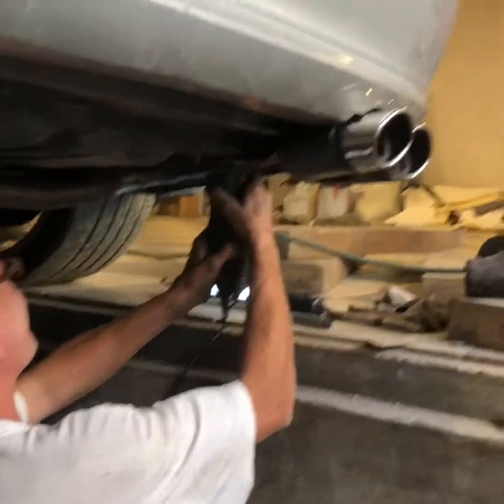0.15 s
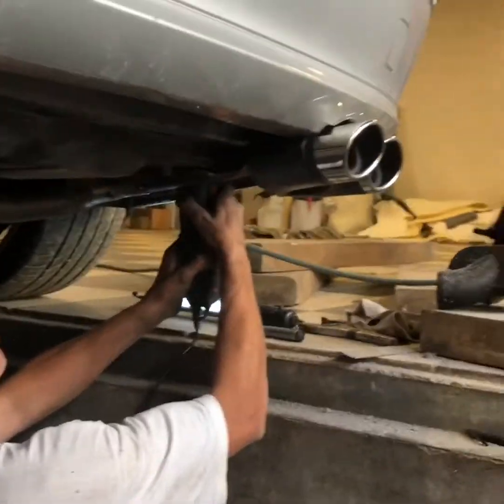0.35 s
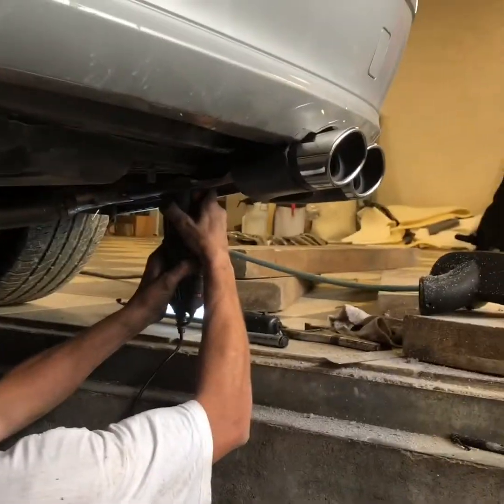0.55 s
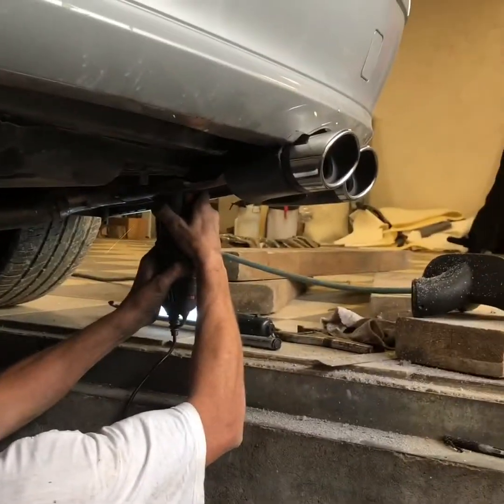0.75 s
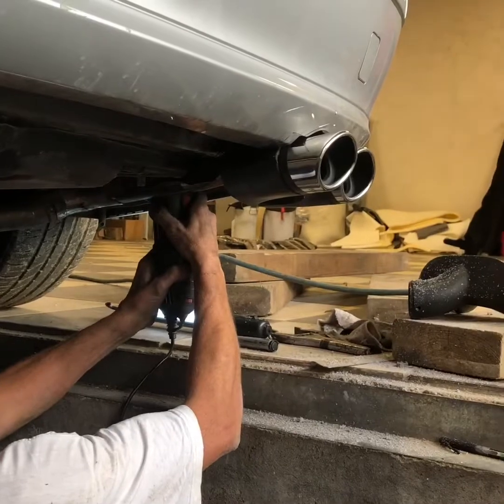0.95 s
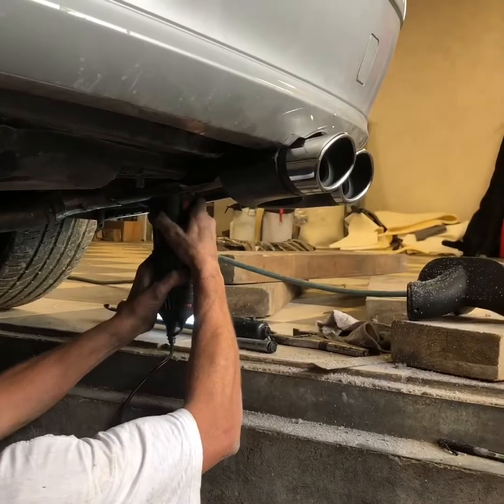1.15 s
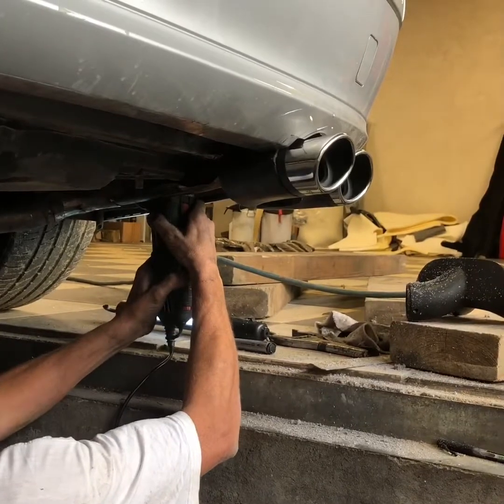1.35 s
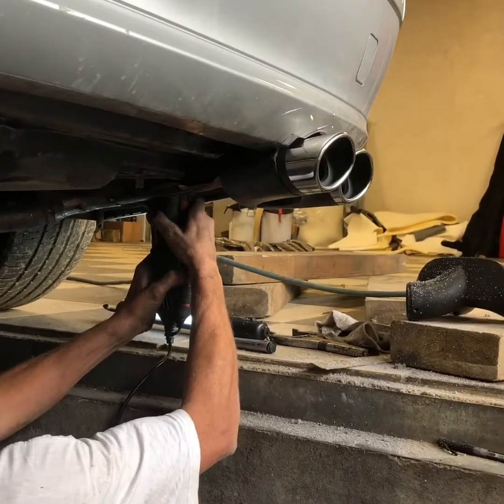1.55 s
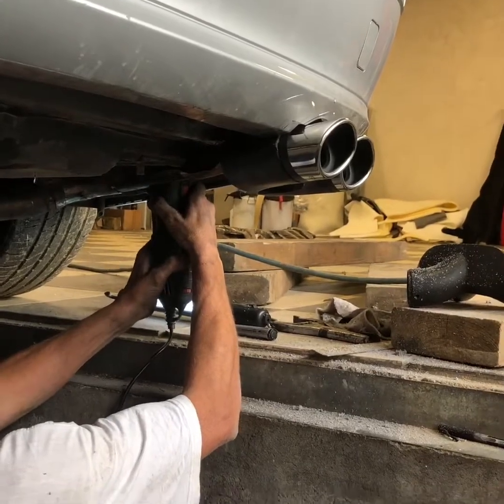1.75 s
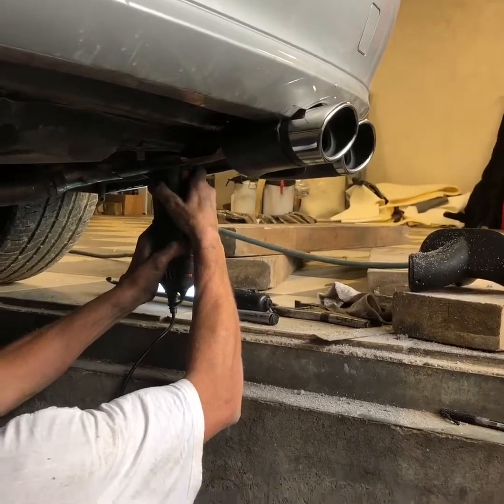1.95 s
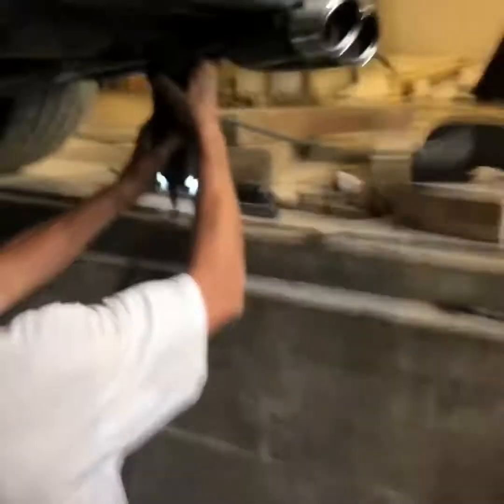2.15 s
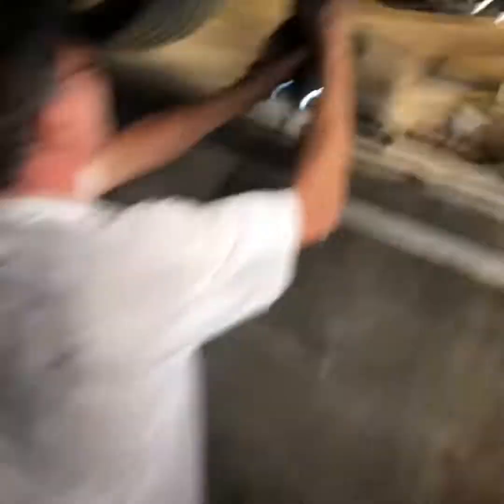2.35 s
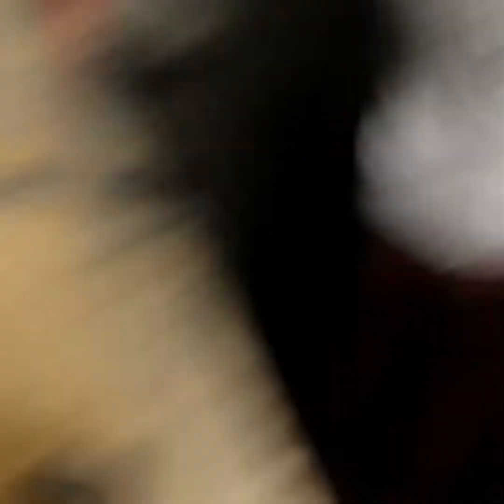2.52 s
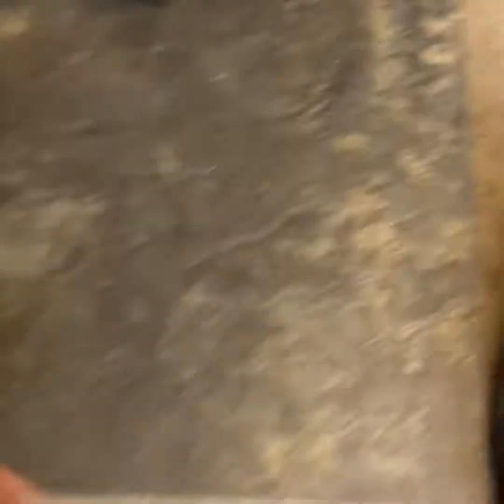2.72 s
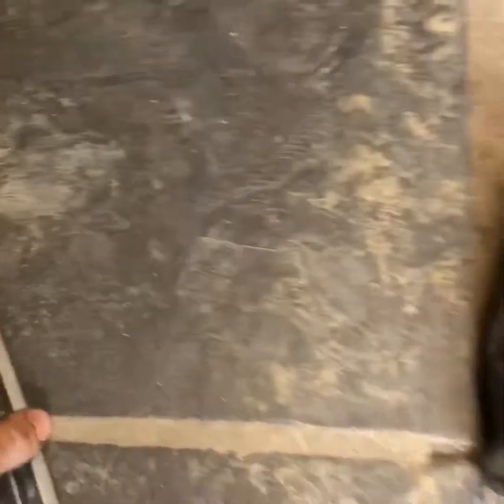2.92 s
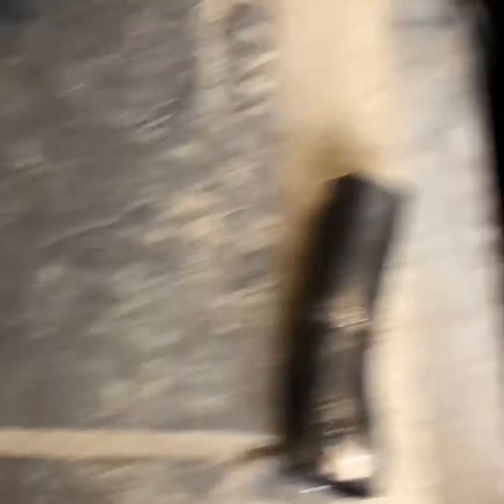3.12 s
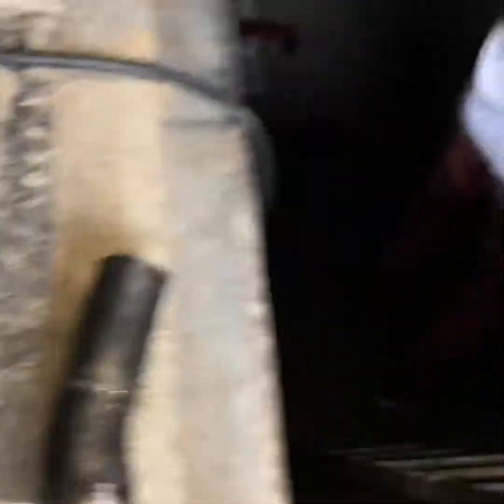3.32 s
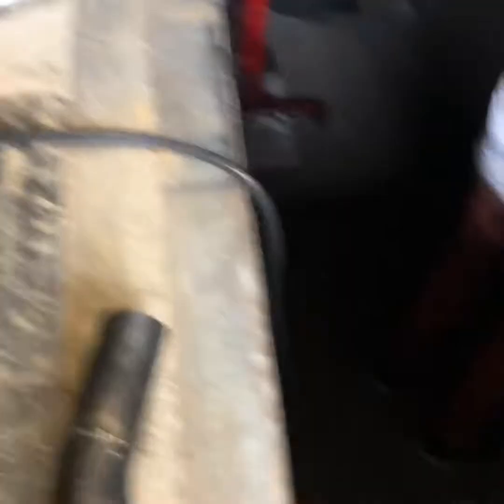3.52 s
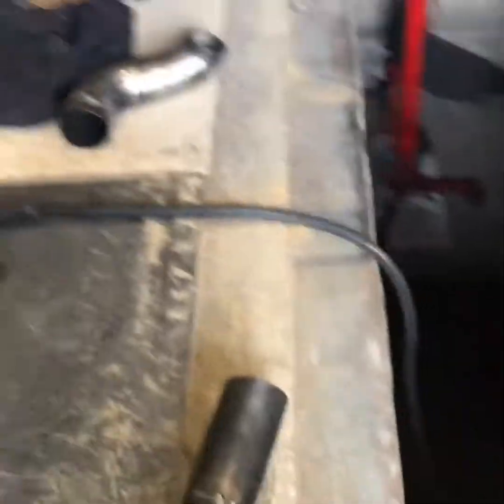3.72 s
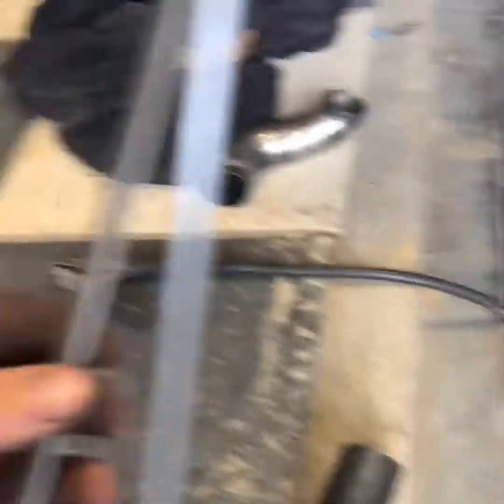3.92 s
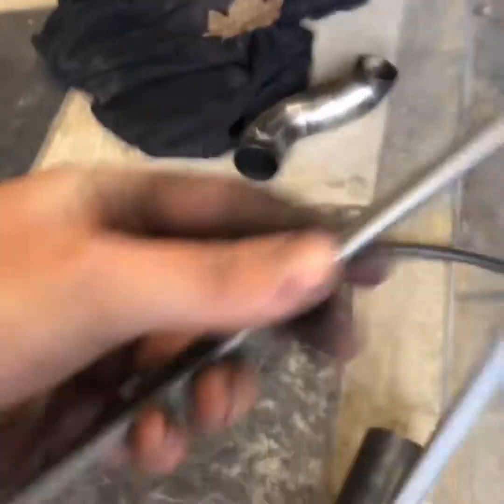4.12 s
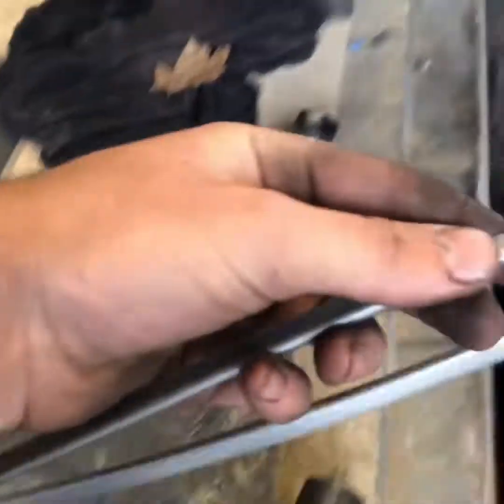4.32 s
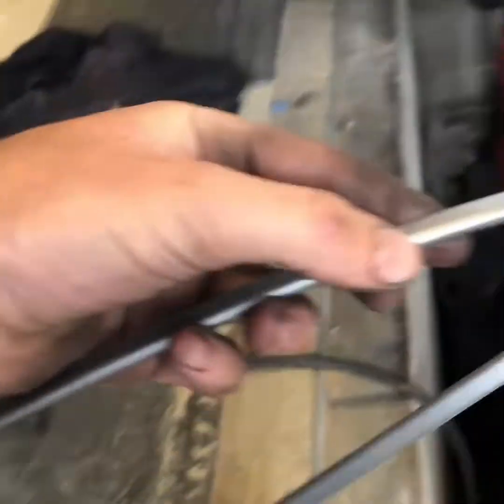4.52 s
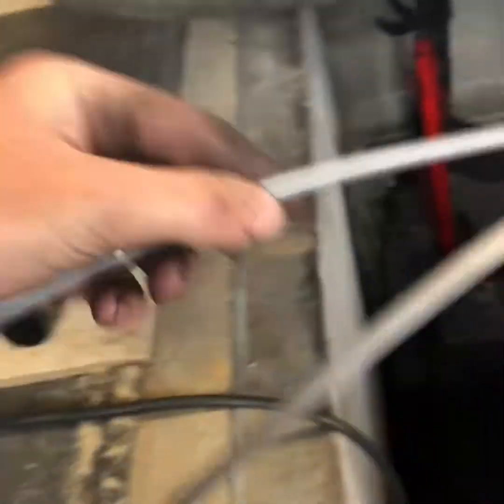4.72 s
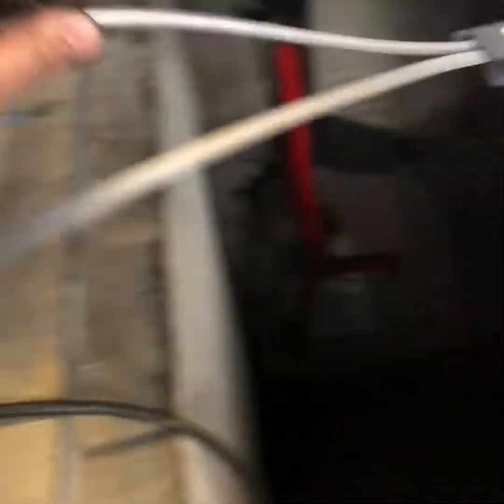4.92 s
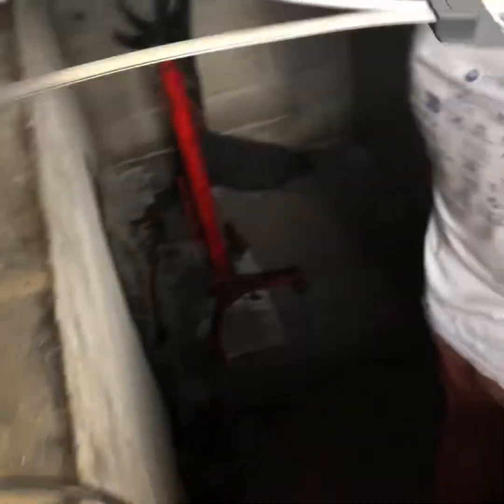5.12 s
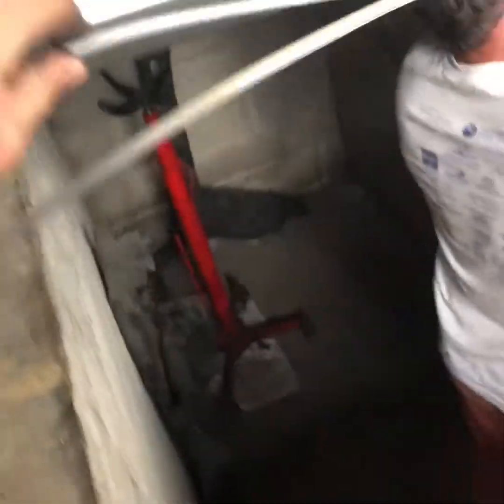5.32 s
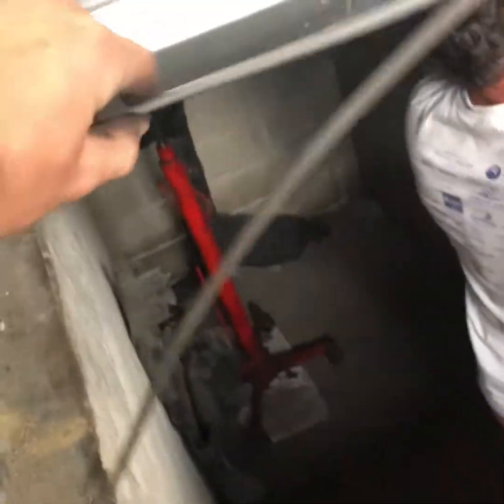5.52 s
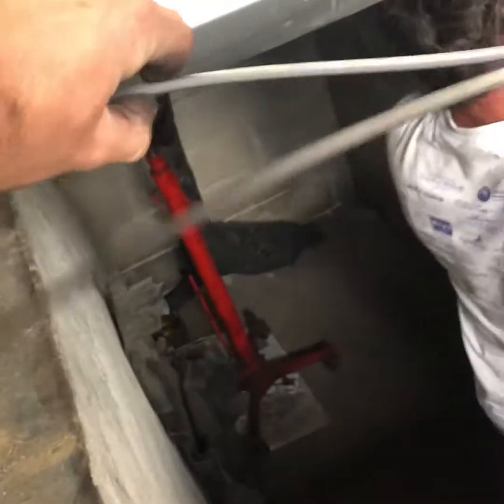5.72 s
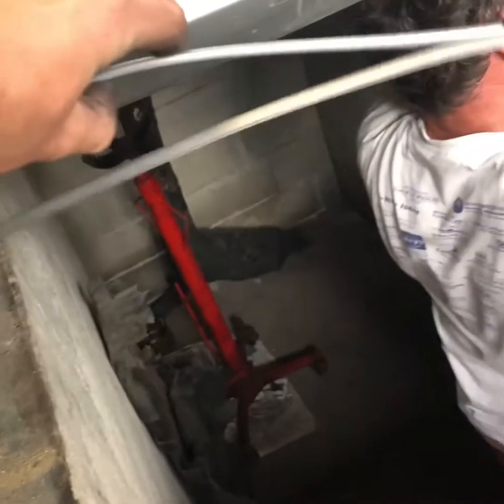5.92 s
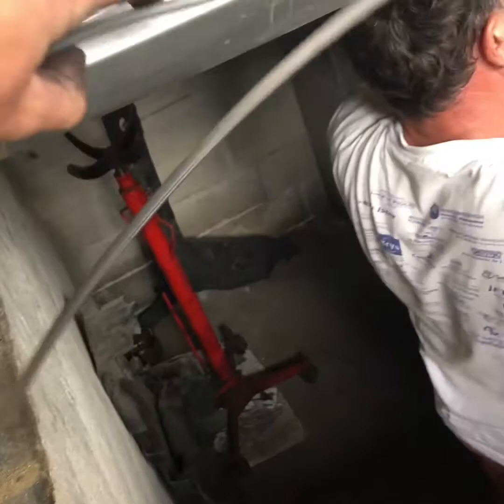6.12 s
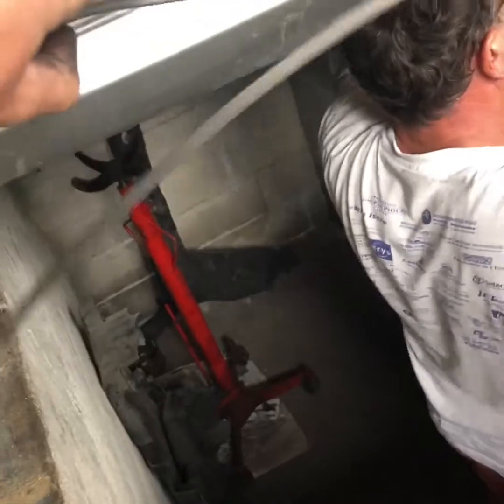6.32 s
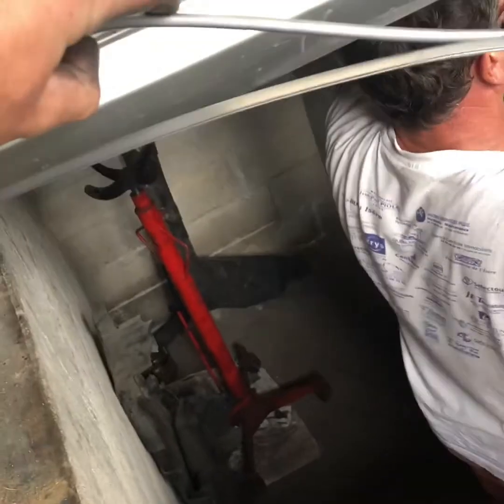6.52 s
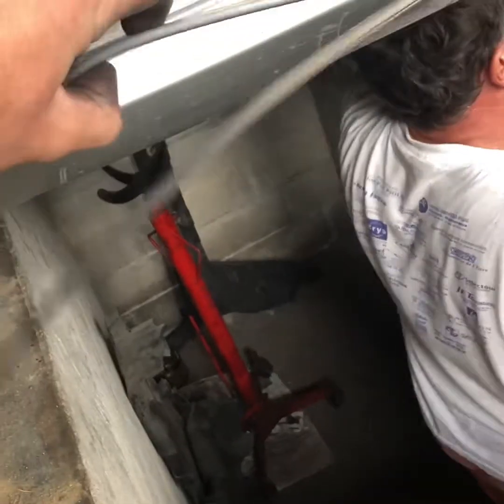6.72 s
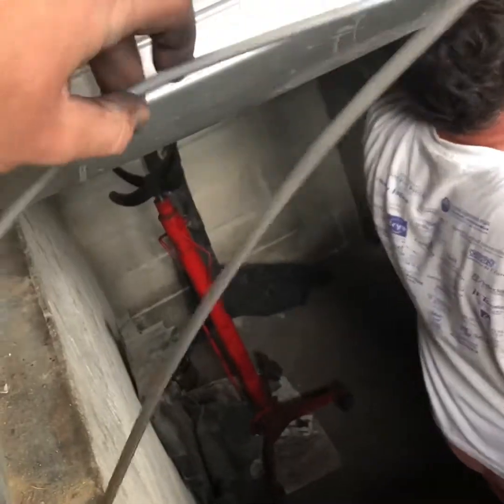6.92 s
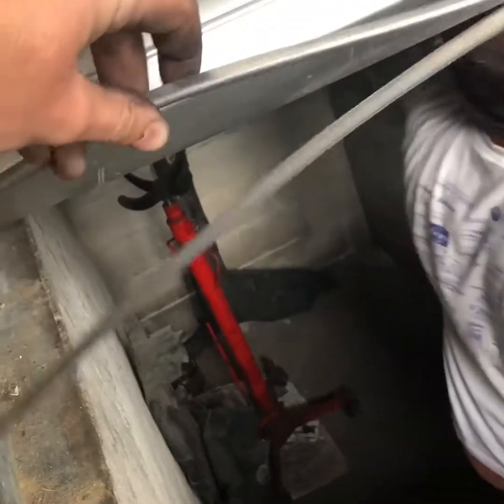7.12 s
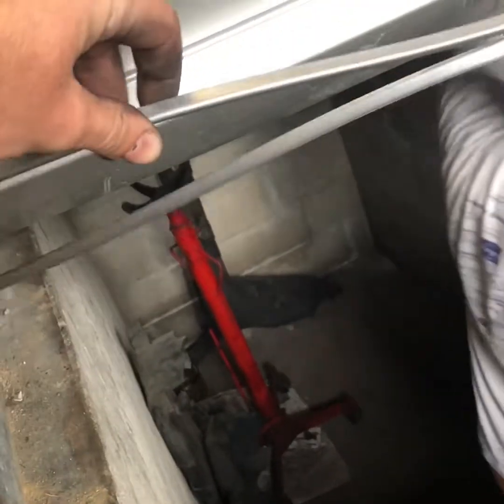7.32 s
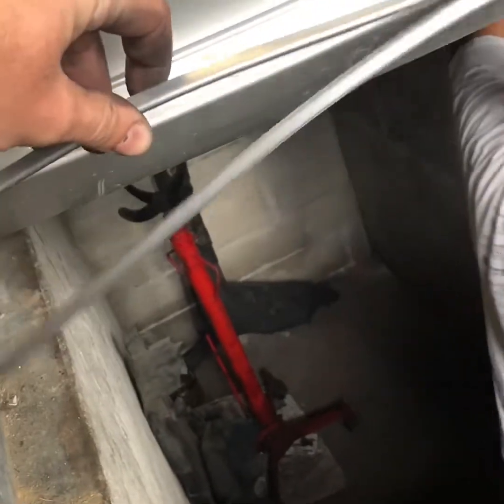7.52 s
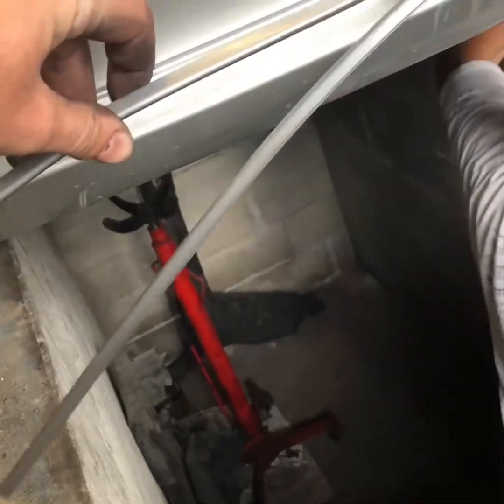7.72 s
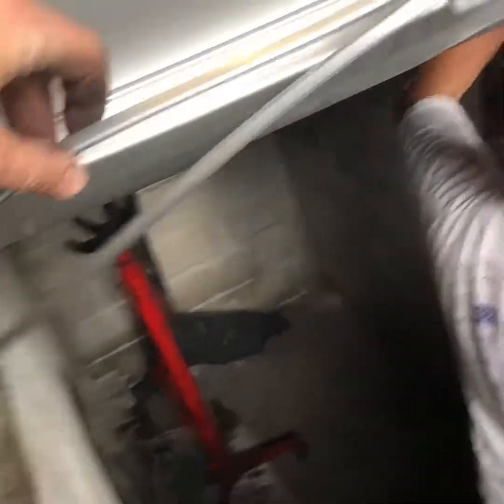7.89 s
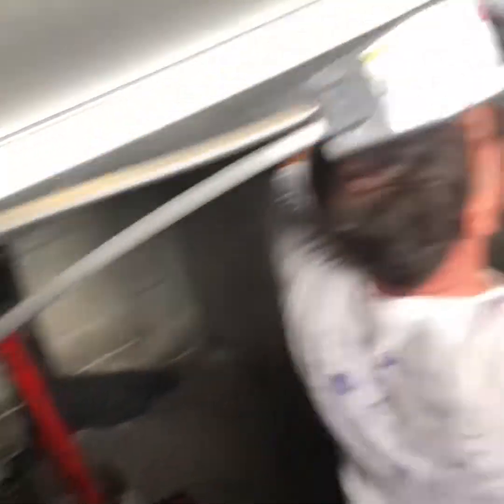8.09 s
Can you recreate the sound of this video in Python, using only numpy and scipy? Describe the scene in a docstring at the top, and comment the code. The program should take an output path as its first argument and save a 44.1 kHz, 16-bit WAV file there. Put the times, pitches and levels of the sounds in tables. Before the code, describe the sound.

In a concrete garage pit, an angle grinder rasps harshly on a steel exhaust pipe, with a pulsing scrape and wavering squeal. The grinding fades as the microphone turns away, with a few soft handling thumps. The tool whines freely, is switched off and coasts down, its loose gears rattling and clacking. Near the end come a few sharp, hollow knocks over a faint lamp hum.

```python
"""An angle grinder rasps on a steel exhaust pipe in a concrete garage pit: grit excites the pipe's modes,
which fade as the microphone turns away. The disc lifts off; the tool runs free with fan noise and whine,
is switched off and coasts down, its loose gears rattling the casing. A tube lamp hums at mains harmonics.
Four soft handling thumps come midway, and sharper knocks with a hollow boom near the end."""
import sys
import numpy as np
from scipy import signal
from scipy.fft import rfft, irfft, next_fast_len
from scipy.io import wavfile
from scipy.ndimage import uniform_filter1d

SR = 44100
rng = np.random.default_rng(int(sys.argv[2]) if len(sys.argv) > 2 else 0)


def wav_out(sig):
    """Save sig, one row per channel (or a flat mono array), as 16-bit PCM at SR to the path in sys.argv[1]."""
    wavfile.write(sys.argv[1], SR, np.round(np.clip(np.atleast_2d(sig).T, -1, 1) * 32767).astype(np.int16))


N = 359403
T = np.arange(N) / SR
RUN_HZ, PINION, CROWN = 317.4, 11, 36  # full shaft speed; teeth on the two gears
# Gearbox modes. Each row: frequency in Hz, width in Hz, relative level in dB.
GEARBOX = [(3150, 250, -8), (3736, 220, -2), (3924, 190, 4.5), (4542, 84, 4), (4740, 270, 5)]
# Tooth knocks of the last slow turns. Each row: time in seconds, level in dB.
COAST_LEVEL = [(6.2, -68), (6.6, -60), (7.0, -59), (7.3, -58.5), (7.6, -61.5), (7.85, -65.5), (8.15, -72)]


def undb(db):
    return 10 ** (np.asarray(db) / 20)


def unit(x):
    return x / np.sqrt(np.mean(x ** 2))


def noise():
    return rng.standard_normal(N)


def curves(table):
    """Linear interpolation of each column over time."""
    s, *columns = np.transpose(table)
    return [np.interp(T, s, c) for c in columns]


def walk(rate):
    """Slow random modulation: about `rate` values a second, smoothed, with a spread near 1."""
    k = int(SR / rate)
    steps = np.repeat(rng.standard_normal(N // k + 1), k)
    return 0.99 * uniform_filter1d(uniform_filter1d(steps, k), k)[:N]


def spell(start, end):
    """A gate with linear fades of 41 ms."""
    return np.clip(np.minimum(T - start, end - T) / 0.041 + .5, 0, 1)


def add(out, s, sound):
    """Superposition of a sound starting at s seconds."""
    i = int(s * SR)
    out[i:i + len(sound)] += sound[:N - i]


def shape(x, gain):
    """Linear filtering: the spectrum is multiplied by gain(frequency)."""
    size = next_fast_len(len(x))
    return irfft(rfft(x, size) * gain(np.arange(size // 2 + 1) * SR / size + 1), size)[:len(x)]


def colour(points):
    """A spectral envelope through (Hz, dB) points, on a logarithmic frequency axis."""
    hz, db = np.transpose(points)
    return lambda f: undb(np.interp(np.log(f), np.log(hz), db))


def modes(table):
    """Frequency response of damped resonators in parallel."""
    return lambda f: sum(undb(db) / (1 + 1j * (f / hz - hz / f) * hz / width) for hz, width, db in table)


def resonate(x, hz, width):
    """Two equal resonators in series pass a band with steep skirts."""
    return shape(x, lambda f: modes([(hz, width, 0)])(f) ** 2)


def band(x, lo_hz, hi_hz):
    """Band-pass filtering to unit rms."""
    return unit(shape(x, lambda f: 1 / np.sqrt((1 + (lo_hz / f) ** 8) * (1 + (f / hi_hz) ** 8))))


def contact_force(disc):
    """Sawtooth modulation: a high spot bites each turn, a bounce every second turn, and each eases off."""
    # Each row: time in seconds, depth of the bounce in dB, depth of the high spot in dB.
    depths = [(0, 4, 4), (.3, 7.5, 4), (1.1, 6.5, 4), (1.4, 1.5, 4.5), (2.15, 1.5, 4.5), (2.3, 6, 3),
              (2.45, 1.5, 2.5), (3.3, 1.5, 2.5)]
    bounce_db, spot_db = curves(depths)
    bounce = (disc / 2 + .04 * walk(15)) % 1
    spot = (disc + .06 * walk(15)) % 1
    pulse_db = (1 + .35 * walk(8)) * (bounce_db * (.5 - bounce) + spot_db * (.5 - spot))
    force = undb(pulse_db + .8 * walk(35) + walk(250) + .35 * walk(8))
    return uniform_filter1d(force, size=SR // 500)


def rasp(bite):
    """Friction noise drives the pipe's modes; the same grit returns each turn, forming a comb filter."""
    # Each row: time in seconds, rasp level in dB, then body, sizzle and rumble in dB relative to it.
    levels = [(0, -33, -15.5, -2, -22), (.5, -32.5, -15.5, -4, -24), (1.05, -33, -16, -3, -25),
              (1.38, -30.5, -20.5, -5, -28), (1.78, -33, -16, -2, -20), (1.95, -32, -17, -1.5, -26.5),
              (2.3, -31.5, -16, -3, -27.5), (2.55, -32, -11.5, 1, -16.5), (2.7, -35, -14.5, 1.5, -20.5),
              (2.86, -38.5, -12.5, -1.5, -24), (2.98, -35, -18, -1, -26), (3.06, -41, -11, -6, -24),
              (3.13, -39, -9, -4.5, -27), (3.26, -50.5, -6, -13, -10), (3.36, -63, -8, -11, -17.5)]
    # Spectrum of the scrape. Each row: frequency in Hz, relative density in dB.
    spectrum = [(71, -68), (120, -23.5), (295, -18), (773, -27.5), (1140, -18), (1790, -13.5),
                (2240, -19.5), (2990, -6), (3240, -7.5), (3740, -3.5), (4060, -6), (4500, -4), (9990, -2),
                (13000, -8.5), (16000, -15)]
    # Each row: frequency in Hz, width in Hz, relative level in dB.
    pipe_modes = [(1286, 23, -5.5), (1845, 30, -7), (2677, 80, -1), (3010, 20, -3), (3310, 45, -8),
                  (3494, 18, -1.5), (3790, 70, -4), (3868, 40, -3), (4360, 90, -8), (4550, 55, -3),
                  (4752, 27, -4), (4940, 30, -4), (5336, 80, -4), (5630, 18, -5.5), (6180, 38, -4),
                  (6350, 38, -2), (6850, 50, -3), (6987, 20, -5.5), (7290, 60, -3), (8250, 90, -3),
                  (8630, 40, -2), (8920, 35, -4), (9655, 50, 1), (10500, 80, -3), (10900, 40, -6),
                  (11480, 100, -2), (12000, 100, -6), (12900, 100, -1), (13650, 70, -5)]
    rasp_db, body_db, sizzle_db, rumble_db = curves(levels)
    turn = round(SR * CROWN / PINION / RUN_HZ)
    grit = bite * signal.lfilter([1], np.r_[1, np.zeros(turn - 1), -.4], noise())
    base = colour(spectrum)
    # as the disc creeps along, some modes are fed more than others
    rings = sum(undb(1.6 * walk(1.8)) * shape(grit, lambda f: base(f) * np.abs(modes(pipe_modes[k::4])(f)))
                for k in range(4))
    facing = np.clip((2.624 - T) / 0.47, .15, 1)  # the microphone turns away
    scrape = shape(grit, base) + 2 * facing * rings
    bands = (band(scrape, 2480, 7900)
             + undb(body_db) * band(scrape, 1080, 2100)
             + undb(sizzle_db) * band(scrape, 10600, 18000)
             + undb(rumble_db + 1.5 * walk(12)) * band(scrape, 110, 1050))
    return (T < levels[-1][0]) * undb(rasp_db) * bands


def squeal(bite):
    """Friction sustains the two freest pipe modes as wavering tones."""
    # Each row: time in seconds, levels of the lower and the upper tone in dB.
    levels = [(0, -45.5, -47), (.1, -37.5, -43), (.2, -42, -44), (.3, -38, -42), (.38, -36, -46),
              (.5, -35.5, -38), (.9, -34.5, -39.5), (1.22, -38, -40.5), (1.32, -45, -48.5),
              (1.6, -36.5, -40), (1.75, -42, -41), (1.87, -35.5, -37), (1.96, -52, -39), (2.06, -54, -45),
              (2.13, -38.5, -44), (2.3, -49, -46), (2.5, -56, -45), (2.7, -62, -53)]
    drive = np.sqrt(2) * spell(-1, levels[-1][0]) * bite ** .3
    return drive * sum(undb(db + 0.96 * walk(34)) * np.sin(2 * np.pi * hz * T + 2.1 * walk(40))
                       for hz, db in zip((3006, 6556), curves(levels)))


def passing_modes(bite):
    """Forced resonances stand out as tool and microphone move: wide ones rough, narrow ones tonal."""
    # Each row: start and end in seconds, frequency in Hz, width in Hz, level in dB.
    resonances = [(-3.5, 1.2, 1162, 8.9, -53), (-1, 0.91, 4560, 90, -42.5), (-0.2, .95, 3497, 18, -49.5),
                  (-1.5, .9, 3500, 88, -47), (1, 1.7, 4900, 200, -44), (-1.5, 0.78, 5100, 120, -53.5),
                  (-0.5, 1.076, 1800, 57, -48), (0, 1.1, 1350, 58, -55.5), (2.2, 2.6, 1845, 30, -52),
                  (2.25, 2.58, 1750, 20, -54), (1.25, 1.45, 7150, 200, -41), (1.8, 2.5, 7400, 200, -39),
                  (1.75, 2.3, 2425, 20, -56), (2.93, 3.17, 4900, 110, -43.5), (1.2, 2.8, 4800, 100, -46),
                  (3.1, 3.33, 4520, 60, -54), (3.1, 3.33, 4000, 200, -54), (2.48, 2.72, 3410, 30, -40),
                  (2.15, 2.38, 3490, 24, -43), (3.0, 3.17, 1850, 25, -52.5), (2.78, 2.95, 6900, 50, -48),
                  (2.93, 3.13, 3850, 90, -46), (3.08, 3.22, 3550, 100, -48), (2.3, 2.55, 3870, 46, -44),
                  (1.5, 2.4, 5000, 3100, -41.5), (3.6, 4.28, 1305, 50, -60), (2.5, 3.6, 11600, 560, -65),
                  (1.5, 7.1, 6300, 250, -71.5)]
    out = np.zeros(N)
    for start, end, hz, width, db in resonances:
        mode = unit(shape(noise() * bite, modes([(hz, width, 0)])))
        if width <= 45:
            drive = 1.5 * bite ** .3 * undb(2 * walk(20))
            mode = unit(mode + drive * np.sin(2 * np.pi * hz * T + 2 * walk(2 * width)))
        out += undb(db) * spell(start, end) * mode
    return out


def drumming(disc):
    """Periodic forcing: the disc's unbalance throbs and its high spots drum the pipe until it lifts."""
    # Each row: multiple of the turn rate, relative level in dB.
    harmonics = [(2, -30), (3, -22.5), (4, -19.5), (5, -14), (6, -25.5), (7, -12), (8, -20), (9, -9),
                 (10, -5), (11, -21), (12, 0.5), (13, -2), (14, -11.5), (15, -21.5), (16, -12), (17, -10),
                 (18, -2), (19, 2.5), (20, 2), (21, -11.5), (22, -12.5), (23, -22), (24, -10.5), (25, 1),
                 (26, -7)]
    # Each row: time in seconds, throb in dB, bounce in dB relative to it, drumming gain in dB.
    levels = [(0, -69, -6.5, -61.5), (.25, -69.5, -5.5, -60.5), (1.7, -64, -7, -58.5),
              (1.85, -63, -11, -55), (2.1, -60, -28.5, -52), (2.45, -62.5, -2.5, -51),
              (2.68, -61, -11, -61), (3.3, -67, -40, -65)]
    throb_db, bounce_db, drum_db = curves(levels)
    drum = sum(undb(db + 3.46 * walk(3.82)) * np.sin(2 * np.pi * (k * disc + rng.random()))
               for k, db in harmonics)
    sway = np.sin(2 * np.pi * disc) + undb(bounce_db) * np.sin(np.pi * disc)
    throb = np.sqrt(2) * undb(throb_db + 1.5 * walk(5)) * sway
    touching = np.clip((3.29 - T) / 0.059, 0, 1)
    return touching * (throb + undb(drum_db) * drum)


def lamp():
    """Mains harmonics waver a little over the noise floor of the garage."""
    # Each row: frequency in Hz, rms level in dB.
    harmonics = [(50, -98), (99.8, -74.5), (149.7, -88), (199.6, -66.5), (249.5, -83.5), (299.4, -75),
                 (399.2, -96.5)]
    # Each row: frequency in Hz, relative density in dB.
    room_spectrum = [(15, -65.5), (25, -32.5), (145, -11.5), (200, -12), (439, -14), (624, -19), (840, -24),
                     (1130, -14), (4740, -30), (16000, -60)]
    hum = sum(undb(db + walk(3.3)) * np.sqrt(2) * np.sin(2 * np.pi * (hz * T + rng.random()))
              for hz, db in harmonics)
    return hum + undb(-66.5 + 1.6 * walk(6.7)) * unit(shape(noise(), colour(room_spectrum)))


def click(hz, t60, peak_db):
    """A hard contact: one heavily damped sinusoid."""
    t = np.arange(SR // 50) / SR
    return undb(peak_db) * np.sin(2 * np.pi * hz * t) * np.exp(-np.log(1000) * t / t60)


def burst(hz, width, t60, peak_db):
    """An impact: exponentially decaying noise through a resonance."""
    t = np.arange(SR // 4) / SR
    y = resonate(rng.standard_normal(len(t)) * np.exp(-np.log(1000) * t / t60), hz, width)
    return y * undb(peak_db) / np.abs(y).max()


def ring(table, hard_hz):
    """Free decay of struck modes; a soft contact barely excites those above hard_hz."""
    t = np.arange(SR // 2) / SR
    out = np.zeros(len(t))
    for hz, db, t60 in table:
        level = undb(db + 1.5 * rng.standard_normal()) / (1 + (hz / hard_hz) ** 2)
        out += level * np.sin(2 * np.pi * (hz * t + rng.random())) * np.exp(-np.log(1000) * t / t60)
    return np.minimum(t / .002, 1) * out


def thumps_and_knocks():
    """Impact excitation: four soft, low handling thumps, then sharper knocks that ring and boom."""
    # Each row: start in seconds, level in dB, hardness in Hz, then boom and ring in relative dB.
    blows = [(2.372, -47, 300, 3, -4), (2.619, -45.5, 301, -2, -4.5), (3.271, -48, 500, -11, -9),
             (3.498, -49, 503, -13, -11), (6.881, -39, 2450, -8, 5), (6.948, -41.5, 2500, -10, -1),
             (6.99, -47, 1500, -14, 0), (7.1666, -28, 8850, -4.5, -10)]
    # Each row of both: frequency in Hz, relative level in dB, time to decay by 60 dB in seconds.
    boom_modes = [(80, -5, .2), (203, 0, 0.18), (259, -0.5, 0.34), (490, -9, .12), (657, -11, .25),
                  (742, -4, .25), (861, -10, .25), (1120, -14, .13)]
    ring_modes = [(1312, -1, 0.072), (2160, 0.5, 0.0076), (3860, -2, 0.038)]
    out = np.zeros(N)
    for s, db, hard_hz, boom_db, ring_db in blows:
        add(out, s, click(hard_hz, .0015, db + 11))
        add(out, s + 0.0013, burst(hard_hz / 2, 0.49 * hard_hz, 0.044, db - 0.5))
        add(out, s + 0.0025, ring(ring_modes, hard_hz) * undb(db + ring_db))
        add(out, s + 0.0046, burst(550, 1400, 0.16, db + boom_db + 3))  # thud
        add(out, s + 0.00802, ring(boom_modes, hard_hz) * undb(db + boom_db - 8))
    return out


def rattle(speed, table, slack):
    """Backlash: random blows of loose gears ring a few modes, fewer and more bunched as they slow."""
    strikes = rng.random(N) < (150 + 1800 * speed) / SR
    blows = strikes * undb(2.4 * np.minimum(rng.exponential(size=N), 4)) * np.sign(noise())
    bunching = undb(2.5 * walk(35) - (15.5 - 7 * speed) * slack)
    drive = (unit(blows) + 0.6 * speed * noise()) * bunching
    tooth_hz = PINION * RUN_HZ * speed
    out = np.zeros(N)
    for hz, width, db in table:
        boost_db = 6.5 / (1 + ((tooth_hz - hz) / 280) ** 2)  # a mode rings up as the tooth rate passes
        out += undb(db + boost_db + 2 * walk(3.03)) * unit(resonate(drive, hz, 1.2 * width))
    return unit(out)


def gear_mesh(turns, disc, casing_modes):
    """Tooth errors modulate the mesh tone, adding sidebands; it swells as it crosses casing modes."""
    wobble = (walk(200) + np.cos(2 * np.pi * disc)) * undb(2.9 * walk(30))
    tone = unit(wobble * np.sin(2 * np.pi * PINION * turns + 1.4 * np.sin(2 * np.pi * disc)))
    return shape(tone, modes(casing_modes)) * np.clip((6.3 - T) / 1.3, 0, 1)


def motor(shaft_hz, turns):
    """Shaft harmonics whine through the casing; rotor unbalance radiates poorly below 215 Hz."""
    # Each row: multiple of the shaft rate, relative level in dB.
    orders = [(18, -78), (23, -87), (24, -72), (25, -85.5), (28, -84), (30, -81), (36, -81), (37, -80),
              (48, -74), (61, -78), (72, -79)]
    # Radiation from the casing. Each row: frequency in Hz, gain in dB.
    radiation = [(2300, 1), (2900, 13), (3300, 14), (3650, 17), (3900, 9), (4200, 7), (5400, 10), (6200, 1),
                 (7200, -3), (8600, 4), (10300, 5), (12000, 0)]
    whine = sum(undb(db + 1.5 * walk(4.6) + 3 * walk(18)) / (1 + (k * shaft_hz / 12500) ** 12)
                * np.sin(2 * np.pi * k * turns + .45 * k / 24 * walk(60)) for k, db in orders)
    whine = shape(whine, colour(radiation)) * (shaft_hz / RUN_HZ) ** 0.7
    shake = undb(-65) / (1 + (215 / shaft_hz) ** 16) * np.sin(2 * np.pi * turns)
    return np.sqrt(2) * (whine + shake) * np.clip((6.8 - T) / 0.28, 0, 1)


def gears_and_fan(shaft_hz, turns, disc):
    """Gear and fan noise weaken as powers of speed, over a low drone of air."""
    # Each row: time in seconds, nearness gain in dB, gain of the handle side in dB, drone level in dB.
    position = [(3.35, -5.5, -3.5, -60), (3.6, -0.5, -7, -59), (3.8, -1, -5.5, -58.5),
                (4.08, 0.5, -2.5, -55.5), (4.4, -1.5, -1, -56.5), (4.95, 2, -3.5, -57), (5.3, 2.5, 0, -59),
                (5.6, 2.5, 4.5, -61.5), (6.05, 4, 1.5, -61), (6.4, 3, 1, -63.5), (6.8, 1.5, 3, -63.5),
                (7.15, 2, 2, -62.5), (7.5, 0.5, 2, -65), (7.85, 0, 1, -70), (8.15, 2, 0, -71)]
    # Each row: frequency in Hz, width in Hz, relative level in dB.
    handle_modes = [(633, 58, -6), (1160, 140, -7.5), (1730, 87, -5.5), (2048, 210, 1.5), (2546, 68, -5.5),
                    (2763, 120, -3)]
    # Each row: frequency in Hz, relative density in dB.
    air_spectrum = [(240, -30), (400, -15.5), (1400, -11), (2590, 4.5), (4240, -1.5), (4650, -1.5),
                    (5600, -7), (11900, -13.5), (16000, -33)]
    near_db, handle_db, drone_db = curves(position)
    speed = shaft_hz / RUN_HZ
    law = lambda db, power: undb(db) * speed ** power
    mesh = law(-52.5, 0.57) * gear_mesh(turns, disc, handle_modes[2:] + GEARBOX)
    air = shape(noise() * undb(walk(25)), colour(air_spectrum))
    slack = np.cumsum(34 * (1 + .18 * walk(12))) / SR % 1  # backlash takes up and lets go near 34 Hz
    gears = law(-52.5, 0.38) * rattle(speed, GEARBOX, slack) + law(-59, 0.91) * band(air, 3460, 4800)
    handle = law(-59.5, 0.24) * rattle(speed, handle_modes, slack) + law(-60, 1) * band(air, 1500, 2400)
    fan = law(-57.5, 1.06) * band(air, 5500, 10400) + law(-60, 1.9) * band(air, 14000, 19000)
    give_way = undb(-1.5 * np.clip((T - COAST_LEVEL[0][0]) / 1.2, 0, 1))  # to the last slow knocks
    casing = give_way * (gears + mesh + undb(handle_db) * handle)
    return undb(near_db) * (casing + fan) + undb(drone_db) * band(air, 416, 1334)


def gear_clacks():
    """Single impacts: loud gear clacks, small random ones on the gearbox modes, and thin ticks."""
    # Each row of both: start in seconds, level in dB, centre frequency in Hz.
    clacks = [(3.5594, -44, 4540), (3.5866, -35, 4470), (3.635, -37, 3810), (3.9734, -40, 3900),
              (4.0996, -43, 4430), (4.1395, -41, 4500), (4.1724, -41, 4400), (4.575, -37.5, 4400),
              (4.7694, -39, 4500), (4.8299, -40, 4720), (4.8604, -37, 4660), (5.0898, -41, 2550),
              (5.248, -53, 4700), (5.3433, -44, 2040), (5.3787, -38, 2130), (5.4234, -42, 2200),
              (5.447, -38.5, 2140), (5.476, -42, 4690), (5.4989, -41, 2090), (5.588, -43, 2680),
              (5.6203, -39, 2010), (5.7094, -40, 4700), (5.7813, -48, 2250), (5.906, -35.5, 4620),
              (5.9963, -41.5, 4010), (6.135, -40.5, 4870), (6.1997, -41, 4600), (6.2537, -54, 3990),
              (6.3575, -46, 2930), (6.4962, -47, 1790), (6.585, -44, 4560), (6.6114, -42, 3900),
              (7.0065, -46, 4570), (7.0594, -49, 1670), (7.55, -48.5, 4600), (7.628, -51, 1650)]
    ticks = [(3.397, -34, 4740), (5.984, -35.5, 8850), (6.674, -47, 9600), (7.435, -56, 8000)]
    out = np.zeros(N)
    for s, db, hz in clacks:
        add(out, s, burst(hz, 420, 0.085, db - 1) + burst(hz, 3000, 0.012, db - 5))
    start_s, end_s = 3.2, 6.8
    for place, pick, size in rng.random((30, 3)):
        hz = GEARBOX[2 + int(3 * pick)][0]
        add(out, start_s + place * (end_s - start_s), burst(hz, 400, 0.06, -52 + 3 * size - 7 * place))
    for s, db, hz in ticks:
        add(out, s, burst(hz, 5000, 0.013, db))
    return out


def last_turns():
    """An uneven pulse train of soft tooth knocks rings the casing; each mode comes and goes on its own."""
    # Each row: frequency in Hz, nominal width in Hz, relative density in dB.
    casing_modes = [(624, 28, 0.5), (1163, 53, 0.5), (1690, 120, 0.5), (2103, 49, -6), (2713, 74, 1),
                    (3920, 75, -2.5), (4615, 50, -1)]
    beat = np.cumsum(45 * (1 + .2 * walk(10))) / SR % 1
    knocks = noise() * (np.exp(-beat / .3) + .15) * undb(2.5 * walk(30))
    rings = sum(undb(db + 10 * np.log10(width) + 2 * walk(5)) * unit(resonate(knocks, hz, 1.5 * width))
                for hz, width, db in casing_modes)
    return undb(curves(COAST_LEVEL)[0]) * (T > COAST_LEVEL[0][0]) * unit(rings)


def pit_reverb(x, t60=0.24, wet_db=-10.5):
    """Reverberation: concrete walls add a dense, exponentially decaying tail."""
    t = np.arange(SR // 2) / SR
    tail = rng.standard_normal(len(t)) * np.exp(-np.log(1000) * t / t60) * (t > .004)
    return x + undb(wet_db) * signal.fftconvolve(x, tail / np.linalg.norm(tail))[:N]


def scene():
    """One shaft drives the tool; after switch-off, friction and air drag slow it."""
    off_s, drag_per_s, friction_hz = 4.16, .16, 340
    shaft_hz = (RUN_HZ + friction_hz) * np.exp(-drag_per_s * np.maximum(T - off_s, 0)) - friction_hz
    turns = np.cumsum(shaft_hz) / SR
    disc = turns * PINION / CROWN  # turns of the disc
    bite = contact_force(disc)
    grinding = rasp(bite) + squeal(bite) + passing_modes(bite) + drumming(disc)
    tool = motor(shaft_hz, turns) + gears_and_fan(shaft_hz, turns, disc) + last_turns()
    impacts = resonate(thumps_and_knocks() + gear_clacks(), hz=3000, width=60000)  # thins their bass
    mono = grinding + tool + pit_reverb(impacts) + lamp()
    return np.array([mono, mono])


def record(dry):
    """Band limiting and saturation in a small microphone: no deep bass, rounded peaks, a cut top."""
    thin = signal.sosfilt(signal.butter(2, 45, "high", fs=SR, output="sos"), dry)
    rounded = np.tanh(3.38 * thin) / 3.695
    return signal.sosfilt(signal.ellip(10, .2, 70, 15750, fs=SR, output="sos"), rounded)


dry = scene()
out = record(dry)
wav_out(out)
```